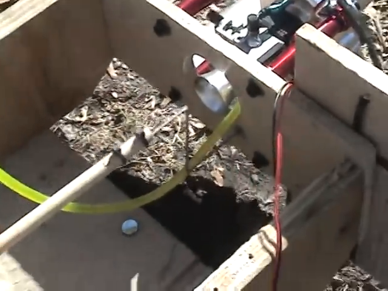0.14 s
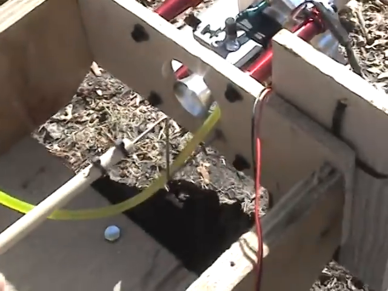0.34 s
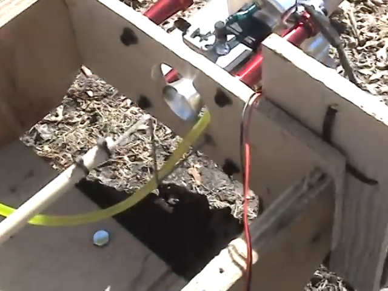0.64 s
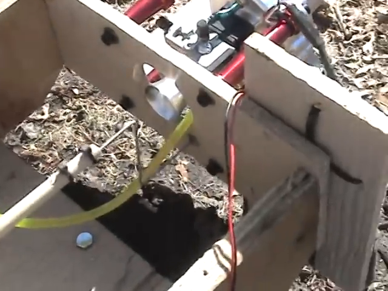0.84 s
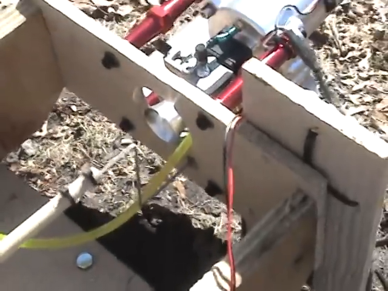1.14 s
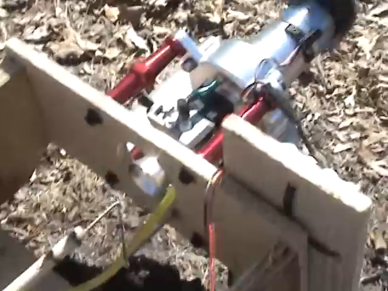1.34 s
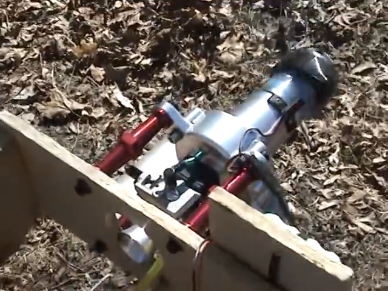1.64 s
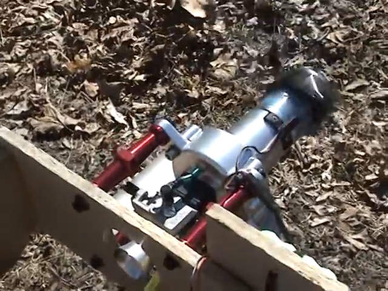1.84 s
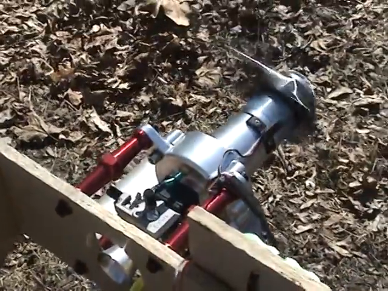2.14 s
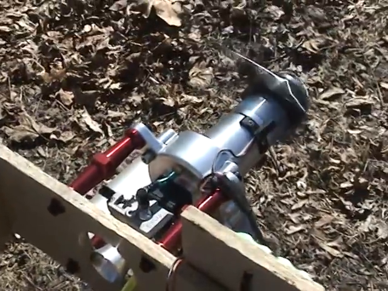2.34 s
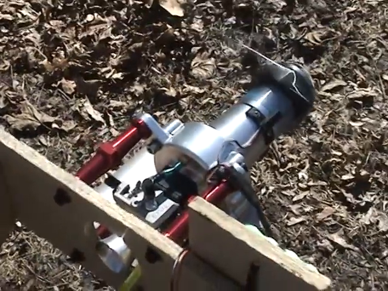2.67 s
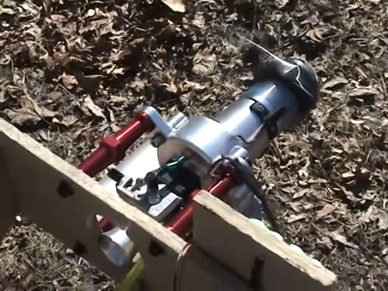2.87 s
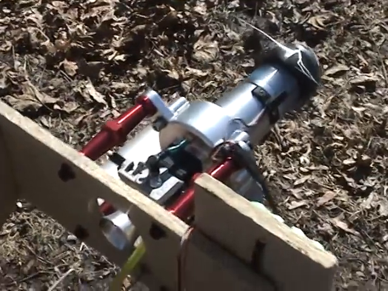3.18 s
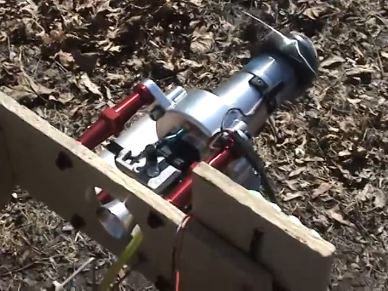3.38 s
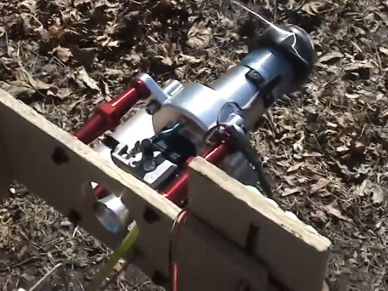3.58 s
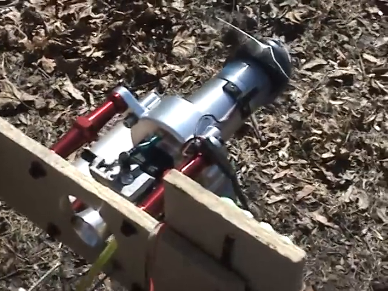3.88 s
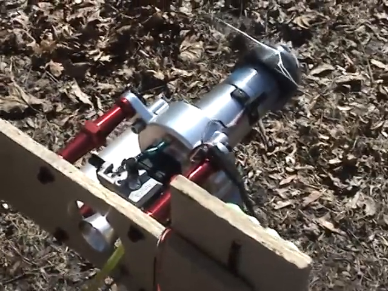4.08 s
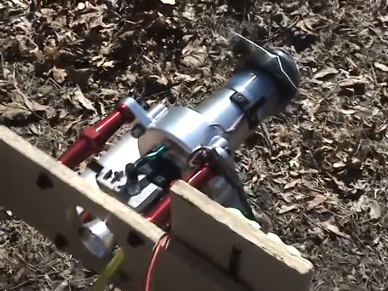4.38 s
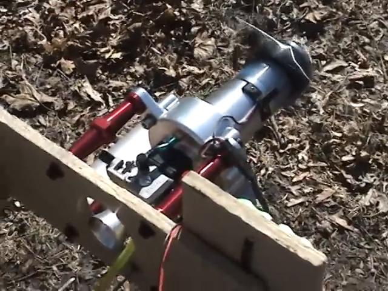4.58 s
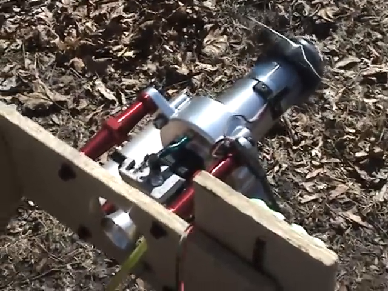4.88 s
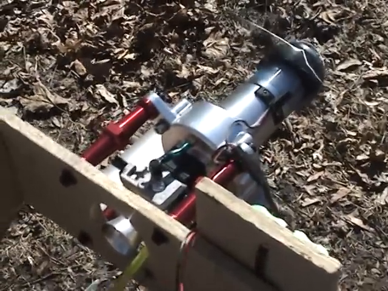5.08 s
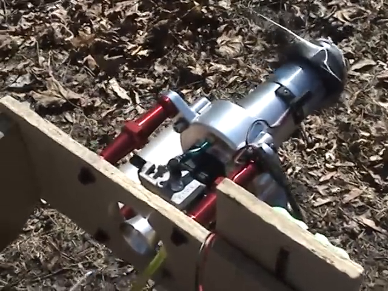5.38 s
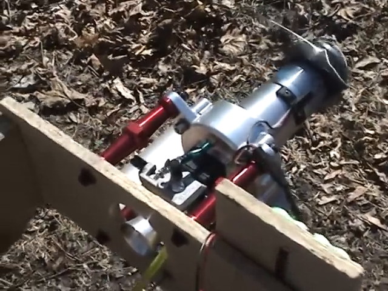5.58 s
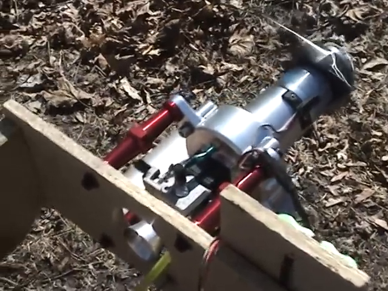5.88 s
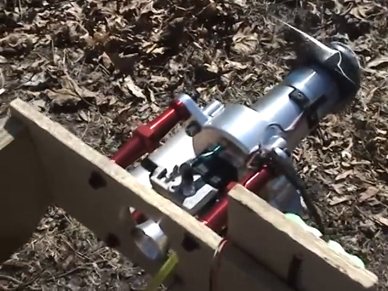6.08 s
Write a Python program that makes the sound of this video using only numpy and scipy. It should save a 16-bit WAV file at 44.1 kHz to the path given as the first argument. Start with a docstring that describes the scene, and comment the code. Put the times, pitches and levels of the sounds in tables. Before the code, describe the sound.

Uneven puttering from a little two-stroke on a wooden stand: dull exhaust thumps, dry cracks, ticking valve clacks and soft puffs on missed turns. The throttle opens and the pops fuse into a harsh, nasal snarl with pulsing hiss and blade noise, rising and falling repeatedly, briefly sputtering as it catches again. Open air, close handheld microphone, little reverberation, engine central, light wind.

```python
"""Two-stroke engine with propeller

A small single-cylinder two-stroke turns a two-blade propeller on a wooden stand outdoors.
It idles, firing every first to third turn; then the throttle is blipped open and shut repeatedly.
Blasts ring muffler and casing modes, intake snaps are short rings and noise gulps, a harmonic stack
locked to the crank drones, filtered noise makes the pulsing hiss, the blade rush and the wind."""
import sys
import numpy as np
from scipy import signal
from scipy.fft import rfft, irfft, next_fast_len
from scipy.io import wavfile
from scipy.ndimage import uniform_filter1d

SR = 44100
rng = np.random.default_rng(int(sys.argv[2]) if len(sys.argv) > 2 else 0)


def volts_from_decibels(level):
    """Turn decibel levels (scalar or array-like) into linear amplitude factors."""
    exponent = np.asarray(level, float) / 20
    return 10 ** exponent


def log_audio(samples):
    """Write samples as a 16-bit WAV file to the path given in sys.argv[1]."""
    # one column per channel
    frames = np.atleast_2d(samples).T
    # limit to full scale, then quantise
    limited = np.clip(frames, -1, 1)
    pcm = np.round(limited * 32767).astype(np.int16)
    wavfile.write(sys.argv[1], SR, pcm)


N = 274302


def rms_one(x):
    """Scale to unit rms."""
    return x / np.sqrt(np.mean(x ** 2) + 1e-20)


def coloured(x, points):
    """Shape by a spectrum joined on a log-frequency axis."""
    size = next_fast_len(N)
    hz = np.arange(size // 2 + 1) * SR / size + 1
    at_hz, db = np.transpose(points)
    gain = volts_from_decibels(np.interp(np.log(hz), np.log(at_hz), db))
    return irfft(rfft(x, size) * gain, size)[..., :N]


def noise(points):
    """Coloured noise of unit rms."""
    return rms_one(coloured(rng.standard_normal(N), points))


def drift(rate_hz):
    """Slow chance of unit rms: white noise through two equal one-pole low-passes."""
    r = np.exp(-2 * np.pi * rate_hz / SR)
    return rms_one(signal.lfilter([1], [1, -2 * r, r * r], rng.standard_normal(N + SR))[SR:])


def filtered(x, order, hz, kind="low"):
    """Butterworth filter."""
    return signal.sosfilt(signal.butter(order, hz, kind, fs=SR, output="sos"), x)


def ring(clicks, hz, t60_s):
    """Damped resonator: a unit click starts a decaying sine of height 1."""
    r, w = volts_from_decibels(-60 / (t60_s * SR)), 2 * np.pi * hz / SR
    return signal.lfilter([0, np.sin(w)], [1, -2 * r * np.cos(w), r * r], clicks + 1e-18)


def body(at, level_db, modes, spread_db):
    """Blows at the given samples ring every mode, each with a random strength."""
    out, chance = np.zeros(N), rng.standard_normal((len(at), len(modes)))
    for k, (hz, mode_db, t60_s) in enumerate(modes):
        clicks = np.zeros(N)
        clicks[at] = volts_from_decibels(level_db + mode_db + spread_db * chance[:, k])
        out += (-1) ** k * ring(clicks, hz, t60_s)
    return out


def puffs(at, level_db, rise_s):
    """Envelope of short gas gusts: quick rise to the peak, then decay."""
    clicks, r = np.zeros(N), np.exp(-1 / (rise_s * SR))
    clicks[at] = volts_from_decibels(level_db)
    return signal.lfilter([np.e * (1 - r)], [1, -2 * r, r * r], clicks + 1e-18)


# spectrum of the blade rush: (frequency [Hz], relative density [dB])
RUSH = [(250, -30), (500, 12), (750, 7), (1200, 8), (2500, 6), (4200, 2.5), (6400, -2.5), (9400, -2.5),
        (14000, -11), (15800, -30)]
# spectrum of the wind: (frequency [Hz], relative density [dB])
WIND = [(12, -18), (25, -20), (55, -7), (80, -32), (150, -13.5)]


def slipstream(rush_db=-33.5, wind_db=-36.5):
    """Steady air rush from the blades plus lumpy low wind on the two microphone ports."""
    rush = volts_from_decibels(rush_db + 2.45 * drift(47)) * noise(RUSH)
    lumps = rms_one(coloured(rng.standard_normal((2, N)), WIND + [(600, -60)]))
    wind = lumps[0] + .25 * lumps[1] * [[1], [-1]]
    return rush + volts_from_decibels(wind_db + 2.0 * drift(3)) * wind


# throttle blips, second and third overlapping as one briefly eased:
# (opens [s], shuts [s], torque factor [ratio])
BLIPS = [(1.98, 2.372, .962), (2.51, 2.84, .981), (2.872, 3.222, .984), (3.528, 3.8, 1.01),
         (4.007, 4.398, 1.018), (4.607, 5.069, 1.036), (5.41, 6.166, 1.016)]
LEVER_TRAVEL_S = .097


def throttle(s, run_on_s=0):
    """Throttle opening: ramps of the lever, weighted by the torque of each blip."""
    total = 0
    for opens_s, shuts_s, share in BLIPS:
        opening = np.clip((s - opens_s) / LEVER_TRAVEL_S + .5, 0, 1)
        closing = np.clip((shuts_s + run_on_s - s) / LEVER_TRAVEL_S + .5, 0, 1)
        total = total + share * opening * closing
    return total


PICKUP_TURNS_PER_S, BEST_TURNS_PER_S = 52.8, 99.2
PULL_TURNS_PER_S2, PULL_LOSS_PER_TURN = 353.5, .0456   # peak pull; its loss per squared distance from best speed
FRICTION_PER_S, PROP_DRAG_PER_TURN = .857, .016


def spin_up(start_s):
    """Speed in turns/s from the balance of engine torque, friction and square-law propeller drag."""
    step_s, speeds = 1 / 500, [PICKUP_TURNS_PER_S]
    s = np.arange(start_s, N / SR + step_s, step_s)
    for opening in throttle(s[:-1]):
        v = speeds[-1]
        pull = opening * (PULL_TURNS_PER_S2 - PULL_LOSS_PER_TURN * (v - BEST_TURNS_PER_S) ** 2)
        drag = FRICTION_PER_S * v + PROP_DRAG_PER_TURN * v ** 2
        speeds.append(v + step_s * (pull - drag))
    return np.interp(np.arange(N) / SR, s, speeds)


# idle firings; idling() plays them too: (time [s], relative crack level [dB], relative fin ping level [dB])
FIRINGS = [(0.053, -9.5, -19), (0.158, -13, -27), (0.231, -30, -24), (0.268, -10, -27), (0.374, -12, -34),
           (0.449, -14.5, -32), (0.523, -10, -12), (0.634, -12, -17), (0.705, -26, -35), (0.741, -12, -21),
           (0.848, -10.5, -31), (0.923, -28, -25), (0.96, -16, -17), (1.035, -12, -29), (1.111, -23, -34),
           (1.148, -15, -17), (1.225, -20, -26), (1.262, -16, -17), (1.339, -15.5, -23), (1.415, -14, -26),
           (1.533, -12, -32), (1.616, -29, -29), (1.653, -17.5, -16), (1.734, -16.5, -21),
           (1.813, -19, -21), (1.857, -26, -30), (1.895, -11.5, -13), (2.014, -10.5, -16),
           (2.053, -18.5, -21), (2.086, -19, -23), (2.115, -18, -34), (2.141, -19, -30), (2.165, -10, -20),
           (2.185, -16, -36), (2.206, -13, -15)]
IDLE_TURN_S = .038


def crank():
    """Turns done so far: whole numbers at the idle firings, then the integral of the speed."""
    s, fired_s = np.arange(N) / SR, np.array(FIRINGS)[:, 0]
    steps = np.maximum(1, np.round(np.diff(fired_s) / IDLE_TURN_S))
    idle = np.interp(s, np.r_[fired_s[0] - 2 * IDLE_TURN_S, fired_s], np.r_[-2, 0, np.cumsum(steps)])
    speed = spin_up(fired_s[-1]) * (1 + .002 * drift(20))
    return idle + np.cumsum(speed * (s > fired_s[-1])) / SR


def passes(turns):
    """Samples at which a whole turn is completed."""
    return np.flatnonzero(np.diff(np.floor(turns)) > 0) + 1


# loud intake valve snaps at idle: (time [s], relative peak level [dB])
SNAPS = [(0.0064, -7), (0.2225, -6), (0.26, -3), (0.4758, -9), (0.5878, -8), (0.626, -9), (0.9508, -3),
         (0.9874, -4), (1.026, -3), (1.1023, -3), (1.1392, -1.5), (1.1758, -3), (1.2535, -2), (1.292, -2),
         (1.3685, -9), (1.408, -3), (1.4437, -6), (1.5627, -10), (1.603, -5), (1.6456, -3), (1.7628, -7),
         (1.8442, -3), (1.8865, -12), (2.0436, -14)]
# spectrum of gulped or spat gas: (frequency [Hz], relative density [dB])
GULP = [(500, -7), (1200, 2.5), (2600, 7), (4200, 1.5), (5400, 0), (6400, 2), (7500, -7), (9500, -1),
        (12000, -8.5), (15800, -6.5)]
SNAP_HZ, SNAP_SCATTER_RATIO = 2680, .03
SNAP_LEAD_TURNS = 0.28   # regular intake shutting ahead of the exhaust


def intake_snaps(turns, faint_db=-25.5):
    """The valve shuts once a turn with a gulp of noise; listed snaps add a short loud ring."""
    s, peak_db = np.transpose(SNAPS)
    hz = SNAP_HZ * (1 + SNAP_SCATTER_RATIO * rng.standard_normal(len(s)))
    loud = np.round(s * SR).astype(int)
    every = passes(turns + SNAP_LEAD_TURNS)
    every = every[every < FIRINGS[-1][0] * SR]
    uneven_db = 2 * rng.standard_normal(len(every))
    gulp = puffs(every, faint_db + uneven_db, 0.0035) + puffs(loud, peak_db - 18.0, 0.00044)
    out = gulp * noise(GULP)
    age_s = np.arange(SR // 50) / SR
    envelope = age_s / 0.0018 * np.exp(1 - age_s / 0.00099)
    for start, level_db, pitch_hz in zip(loud, peak_db, hz):
        snap = np.sin(2 * np.pi * pitch_hz * age_s) * envelope
        out[start:start + len(age_s)] += volts_from_decibels(level_db - 7.5) * snap
    return out


# muffler modes: (frequency [Hz], relative level [dB], t60 [s])
MUFFLER = [(182, -9, 0.059), (217.9, 2.5, 0.09), (400.4, -8, 0.12), (647, -30, 0.063), (1130, -32.5, 0.057)]
# cylinder and fin modes: (frequency [Hz], relative level [dB], t60 [s])
CASING = [(1676, 10, 0.019), (1950, 17.5, 0.0054), (2490, 7.5, 0.0099), (3120, -0.5, 0.019),
          (3740, -16, 0.0097), (4060, -1.5, 0.039), (5600, -35, 0.016), (6360, -1.5, 0.03)]
# idle course: (time [s], relative intake hum level [dB], relative unfired puff level [dB])
IDLE = [(0.0, -22, -11), (0.07, -27.5, -15), (1.39, -28.5, -12), (1.52, -34, -14), (1.98, -34, -13),
        (2.08, -26.5, -19), (2.14, -22, -36), (2.2, -10, -20)]
PORT_HZ, PORT_T60_S = 370, .028
FIN_HZ, FIN_T60_S = 2290, 0.054
# firings that crack less than FULL_CRACK_DB blast less too
FULL_BLAST_DB, FULL_CRACK_DB, BLAST_DB_PER_CRACK_DB = 0.6, -16, 0.29


def idling(turns, refill_db=1.5, fade_db=-2.5, hum_hz=288):
    """Fired turns blast and crack, unfired ones puff harder as charge builds; the open intake hums."""
    n = np.arange(N)
    s, crack_db, ping_db = np.transpose(FIRINGS)
    blast_db = FULL_BLAST_DB + BLAST_DB_PER_CRACK_DB * np.minimum(crack_db - FULL_CRACK_DB, 0)
    idle_s, hum_points, puff_points = np.transpose(IDLE)
    hum_db, puff_db = (np.interp(n / SR, idle_s, points) for points in (hum_points, puff_points))
    fired = np.round(s * SR).astype(int)
    every = passes(turns)
    last = np.maximum(np.searchsorted(fired, n) - 1, 0)
    turns_since = np.abs(turns - turns[fired[last]])

    is_unfired = np.abs(every[:, None] - fired).min(axis=1) > SR // 100
    unfired = every[(every < fired[-1]) & is_unfired]
    soft_db = puff_db[unfired] + 4.0 + refill_db * np.round(turns_since[unfired])
    soft = filtered(body(unfired, soft_db, MUFFLER, spread_db=.7), 2, 330)   # unfired puffs are dull

    blast = body(fired, blast_db - 5.0, MUFFLER, spread_db=.7)
    port_thud = body(fired + SR // 1500, blast_db - 1.5, [(PORT_HZ, 0, PORT_T60_S)], spread_db=0)
    blast = filtered(blast + port_thud, 1, 1100)   # port opens over a fraction of a millisecond

    late = fired + SR // 600   # the crack follows once the port is wide open
    crack = body(late, crack_db - 13.5, CASING, spread_db=3.5)
    crack += body(late, ping_db, [(FIN_HZ, 0, FIN_T60_S)], spread_db=4.5)
    spit = puffs(late, crack_db - 6.0, 0.0012) * noise(GULP)

    start = np.r_[0, every][np.searchsorted(every, n, side="right")]
    phase = 2 * np.pi * hum_hz * (n - start) / SR   # restarts every turn
    opening = np.clip((turns % 1 - .3) / .12, 0, 1) * np.clip((1 - turns % 1) / .2, 0, 1)
    hum = volts_from_decibels(hum_db + 13.0 + fade_db * np.floor(turns_since)) * opening
    hum *= np.sin(phase) + 0.041 * np.sin(2 * phase)
    hum *= np.clip((fired[-1] - n) / (.15 * SR), 0, 1)

    # the piston shuts the exhaust port and chokes the muffler, until the last idle firing
    port = np.clip((.42 - turns % 1) / .22, .1, 1)
    port = np.maximum(port, n > fired[-1])
    exhaust = filtered(port * (blast + soft), 2, 130, "high")
    return crack - exhaust + spit + hum


# relative levels by speed, throttle open: (speed [turns/s], drone near 250 Hz [dB],
# bark near 700 Hz [dB], rasp near 2200 Hz [dB], hiss [dB])
OPEN = [(35, -33, -25.5, -26, -30), (58, -18.5, -21.5, -35, -23), (68.2, -16.5, -17, -14.5, -19),
        (97, -13.5, -11.5, -12.5, -14), (99.6, -13, -11.5, -15, -14.5), (118.3, -19, -7.5, -10.5, -13)]
# the same, throttle shut: (speed [turns/s], drone [dB], bark [dB], rasp [dB], hiss [dB])
SHUT = [(61.5, -17, -21, -47, -24.5), (81, -22, -13.5, -35, -22.5), (81.5, -19.5, -20, -15, -24.5),
        (97, -18, -12.5, -55, -20.5)]
SOUND_LAG_S, RUN_ON_S, SOUND_STEEPNESS = .008, .022, 1.6   # the last charge burns on after the lever shuts
HALF_SHUT_BOOM_DB = 3.5   # drone swell while the lever closes


def levels(speed):
    """Drone, bark, rasp and hiss cross between shut and open levels, later and steeper than the lever."""
    lever = np.clip(throttle(np.arange(N) / SR - SOUND_LAG_S, RUN_ON_S), 0, 1)
    load = np.clip((lever - .5) * SOUND_STEEPNESS + .5, 0, 1)

    def at_speed(rows):
        turns_per_s, *columns = np.transpose(rows)
        return np.array([np.interp(speed, turns_per_s, column) for column in columns])

    drone_db, *rest = load * at_speed(OPEN) + (1 - load) * at_speed(SHUT)
    closing = uniform_filter1d(-np.gradient(lever) * SR * LEVER_TRAVEL_S, SR // 40)
    return drone_db + HALF_SHUT_BOOM_DB * np.clip(closing, 0, 1), *rest, load


# gain by blades and port timing: (multiple of turn rate [ratio], gain [dB])
BLADES = [(1, 3), (2, 7), (3, 5), (4, 3.5), (6, 2.5), (7, -2.5), (9, -4)]
# pipe resonances colouring the harmonics: (frequency [Hz], width [Hz], gain [dB])
PIPE = [(246, 123, 14.5), (525, 62, 8), (652, 88, 5.5), (987, 124, 10.5), (1260, 13, 3.5), (1566, 21, 17),
        (2090, 430, 7.5), (2539, 160, 12.5)]
# turns that fail to fire at speed: (time [s])
MISFIRES_S = [2.395, 2.843, 4.42]
MISS_HALF_LENGTH_S, MISS_LOW_LOSS_DB, MISS_HIGH_LOSS_DB = .005, 12, 6   # low: three lowest harmonics
# throttle shut: the two blades (even harmonics) lead, at other crank angles, and the treble dulls above 600 Hz
ODD_LOSS_DB, SLIP_TURNS, COAST_DULL_DB_PER_OCTAVE = 7.0, .12, 7


def harmonics(turns, speed, drone_db, bark_db, rasp_db, load):
    """28 crank-locked harmonics of firing and blades, dipping at misfires, led by the blades when shut."""
    time_s = np.arange(N) / SR
    missed = sum(np.exp(-((time_s - at_s) / MISS_HALF_LENGTH_S) ** 2) for at_s in MISFIRES_S)
    stack, blade_db, coast = np.zeros(N), dict(BLADES), 1 - load
    for k in range(1, 29):
        hz = k * speed
        upper = np.clip(np.log(hz / 250) / np.log(700 / 250), 0, 1)
        top = np.clip(np.log(hz / 700) / np.log(2200 / 700), 0, 1)
        level_db = drone_db - 14.5 + upper * (bark_db - drone_db + 1.5) + top * (rasp_db - bark_db - 7.5)
        level_db += sum(db / (1 + (2 * (hz - at_hz) / width_hz) ** 2) for at_hz, width_hz, db in PIPE)
        level_db += blade_db.get(k, 0)
        level_db -= COAST_DULL_DB_PER_OCTAVE * coast * np.maximum(np.log2(hz / 600), 0)
        level_db -= ODD_LOSS_DB * coast * (k % 2)
        level_db -= missed * (MISS_LOW_LOSS_DB if k < 4 else MISS_HIGH_LOSS_DB)
        # low harmonics peak one after another in the turn; upper resonances delay what passes them
        lag = np.pi * (.17 * speed / 117 * min(k, 7) ** 2 - SLIP_TURNS * coast * min(k, 4) ** 2)
        lag += sum(np.arctan(2 * (hz - at_hz) / width_hz) for at_hz, width_hz, _ in PIPE[3:])
        waver_db, jitter = 1.4 * drift(15), (.02 - .01 * load) * k * drift(40)
        stack += volts_from_decibels(level_db + waver_db) * np.cos(2 * np.pi * k * turns - lag + jitter)
    return stack


# sharp firings as the charge catches again or dies out: (time [s], relative crack level [dB])
CATCHES = [(2.501, -8), (2.531, -17), (3.541, -10), (4.443, -7.5), (4.595, -8.5), (4.623, -24), (4.63, -13),
           (5.419, -7), (5.435, -17)]
COAST_PING_DB = -27   # the fin still pings once a turn while coasting


def rattling(turns, speed, rasp_db, load):
    """Casing rattle, port thuds and fin pings once a turn, plus the listed sharp catches."""
    shut = passes(turns + SNAP_LEAD_TURNS)
    shut = shut[shut > BLIPS[0][0] * SR]
    rattle = body(shut, rasp_db[shut] - 9.0, CASING, spread_db=1)
    catch_s, catch_db = np.transpose(CATCHES)
    caught = np.round(catch_s * SR).astype(int)
    rattle += body(caught, catch_db - 13.0, CASING, spread_db=1.5)
    rattle += puffs(caught, catch_db - 3.0, 0.0011) * noise(GULP)
    rattle -= body(caught, catch_db + 1.0, MUFFLER, spread_db=1)
    every = passes(turns)
    every = every[every > FIRINGS[-1][0] * SR + SR // 200]
    thud_db = rasp_db[every] + 11.0 - 0.27 * (speed[every] - 60)   # single thuds stand out at low speed
    rattle -= body(every, thud_db, [(PORT_HZ, 0, PORT_T60_S)], spread_db=1.5)
    ping_db = COAST_PING_DB - 20 * load[every] + 2.0 * drift(0.77)[every]
    return rattle + body(every, ping_db, [(FIN_HZ, 0, FIN_T60_S / 2)], spread_db=1.5)


# spectrum of the gas jet: (frequency [Hz], relative density [dB])
JET = [(200, -18), (500, -1.5), (1000, -7.5), (1600, -4), (2500, -1), (3400, -9), (4200, -7.5), (5000, -10),
       (9500, -8.5), (12000, -14.5), (15800, -16.5)]


def gas_hiss(turns, hiss_db, load, gating=0.59):
    """Jet noise pulsing once a turn, plus a hollow throat resonance, clearest when throttled."""
    gate = 1 - gating * (1 - 1.59 * np.exp(-3.0 * (turns % 1)))
    jet = noise(JET)
    hollow = rms_one(ring(jet, 1610, 0.04)) * volts_from_decibels(-14 - 12 * load + 2 * drift(4))
    return volts_from_decibels(hiss_db + 3.5 + 0.75 * drift(37)) * (gate * jet + hollow)


def revving(turns):
    """Running at speed: harmonic stack and gas hiss fade in at the first blip, over the rattle."""
    speed = uniform_filter1d(np.gradient(turns) * SR, SR // 40)
    drone_db, bark_db, rasp_db, hiss_db, load = levels(speed)
    stack = harmonics(turns, speed, drone_db, bark_db, rasp_db, load)
    opened = np.clip((np.arange(N) / SR - BLIPS[0][0]) / 0.12, 0, 1)
    return rattling(turns, speed, rasp_db, load) + opened * (gas_hiss(turns, hiss_db, load) + stack)


# colour of the echoes in the side signal: (frequency [Hz], gain [dB])
SIDEWAYS = [(60, -13), (110, -15), (200, -29), (380, -26), (700, -24), (1290, -21), (2380, -18),
            (4400, -21), (8120, -20), (15000, -10)]


def scene():
    """Engine straight ahead; echoes off boards and ground reach the two ports unequally."""
    turns = crank()
    engine = idling(turns) + intake_snaps(turns) + revving(turns)
    lags, signs = rng.integers(SR // 1000, SR // 40, 40), rng.choice([-1, 1], 40)
    scattered = sum(np.roll(engine, lag) * sign for lag, sign in zip(lags, signs))
    echoes = .12 * engine + scattered / np.sqrt(len(lags))
    return slipstream() + engine + coloured(echoes, SIDEWAYS) * [[1], [-1]]


def top_cut(x):
    """Nothing passes above the cut-off."""
    return signal.sosfilt(signal.butter(12, 16000, fs=SR, output="sos"), x)


def record(dry):
    """Cut the bass, squeeze loud peaks, cut the top."""
    cut = filtered(dry, 2, 60, "high")
    squeezed = cut / (1 + np.abs(cut / .8) ** 3) ** (1 / 3)
    mix = signal.sosfilt(signal.cheby2(12, 60, 15900, fs=SR, output="sos"), squeezed)
    return top_cut(mix)


dry = scene()
out = record(dry)
log_audio(out)
```